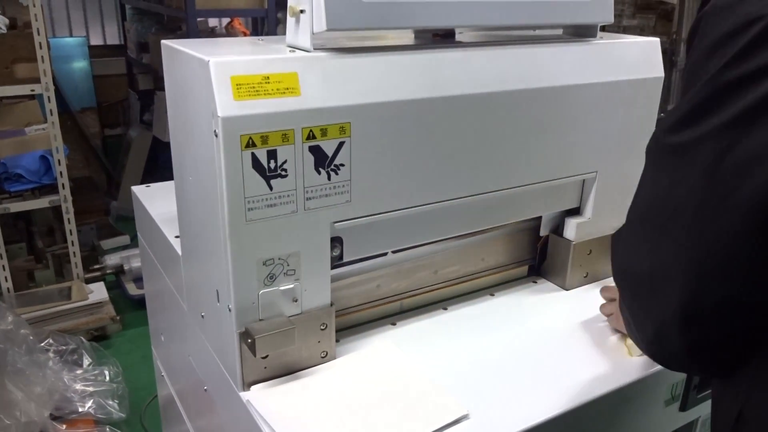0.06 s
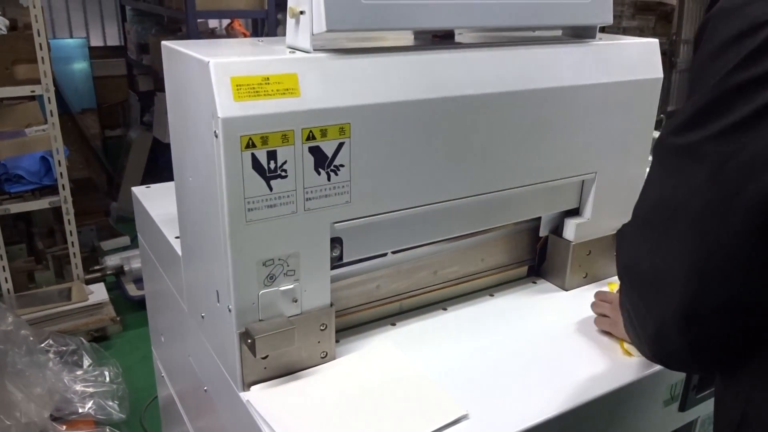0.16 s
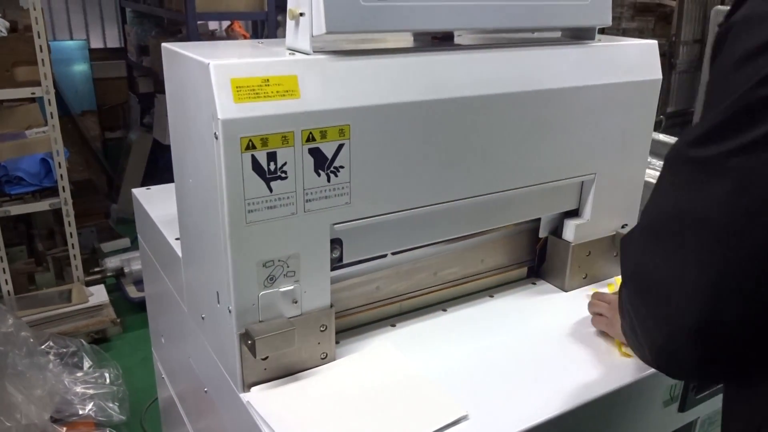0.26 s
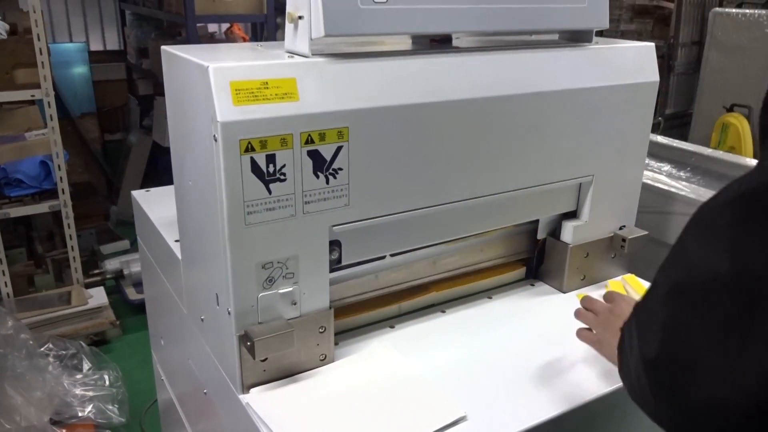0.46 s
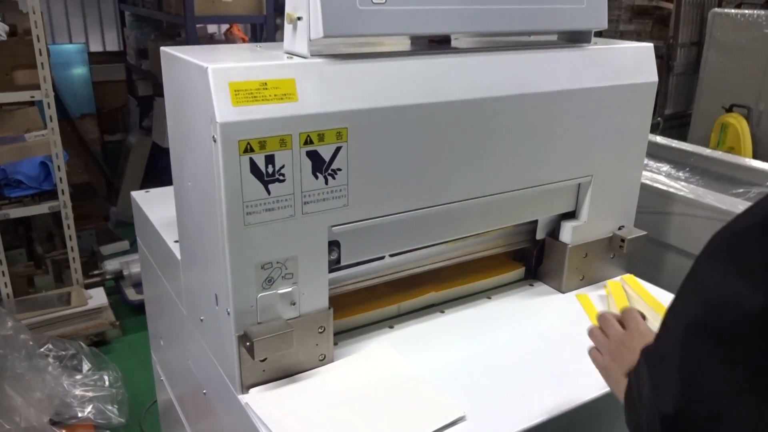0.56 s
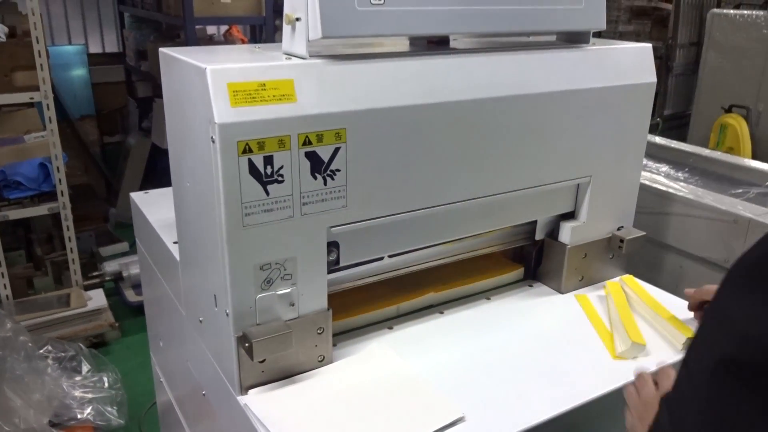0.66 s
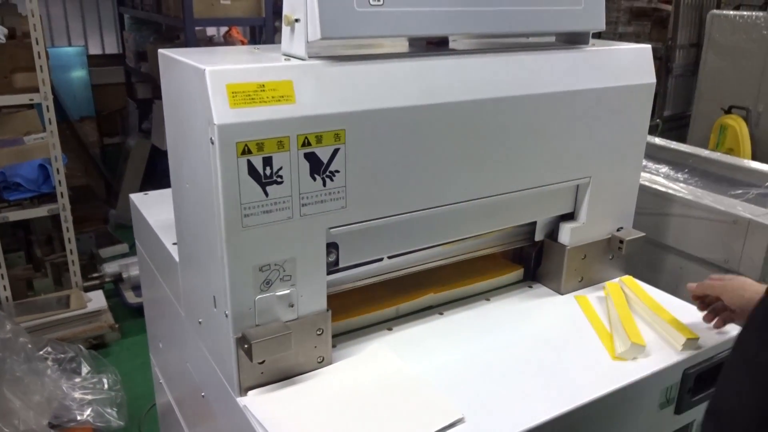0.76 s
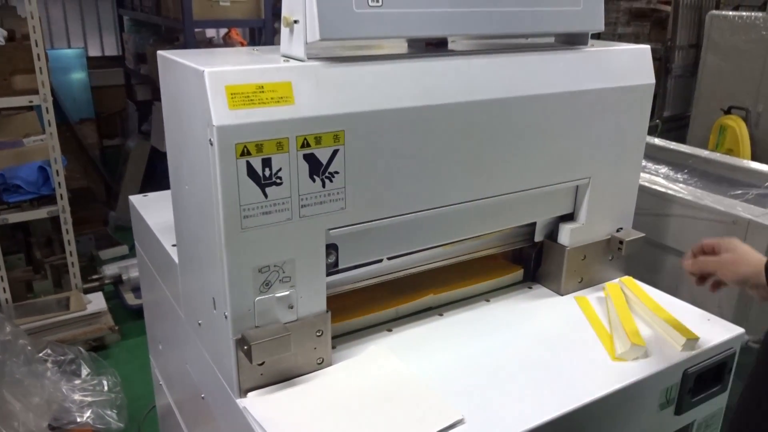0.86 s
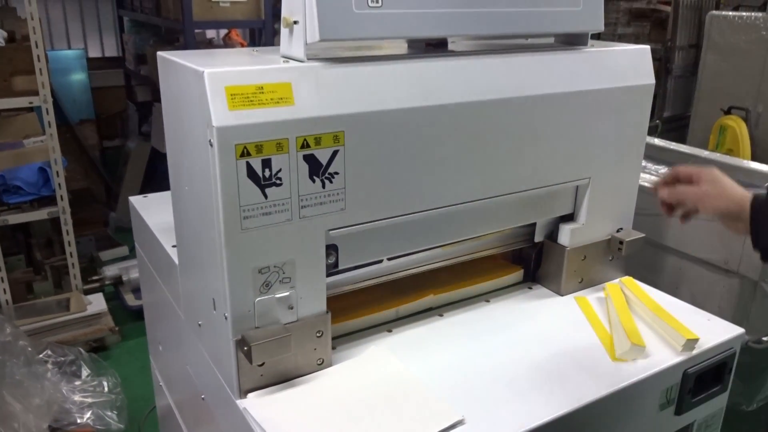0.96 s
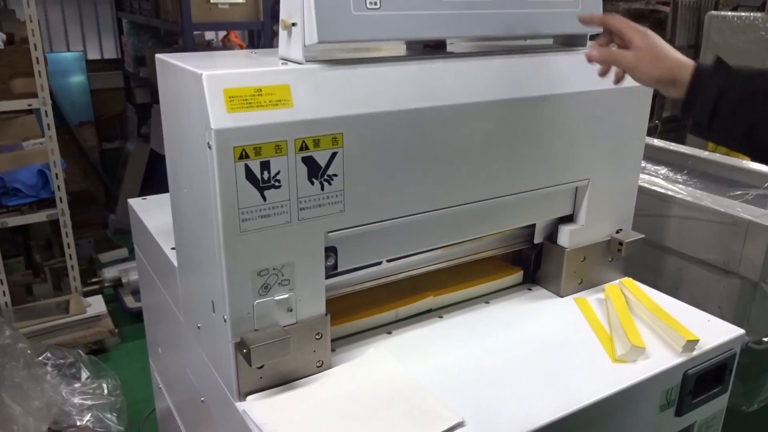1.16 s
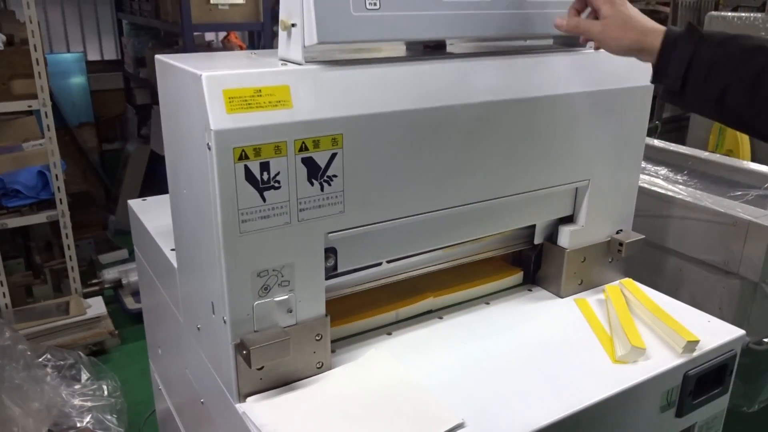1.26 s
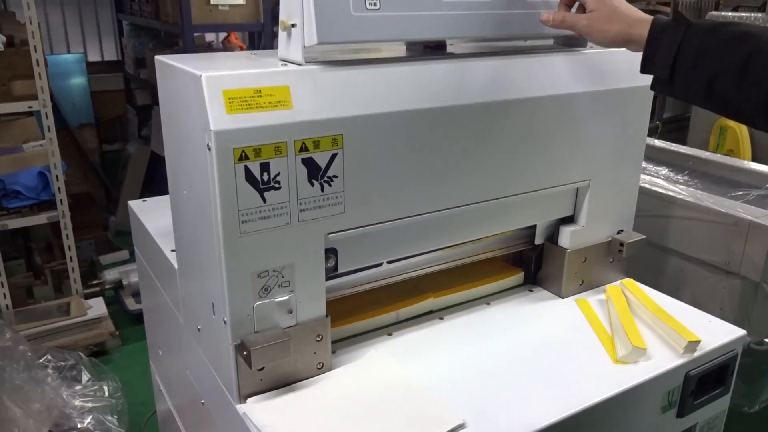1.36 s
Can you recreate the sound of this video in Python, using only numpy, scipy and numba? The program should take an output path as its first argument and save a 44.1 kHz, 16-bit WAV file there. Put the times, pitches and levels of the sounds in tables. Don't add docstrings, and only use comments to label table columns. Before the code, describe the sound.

Paper strips scrape across a cutter's steel table, then a heavy rattling clamp thud and latch click

```python
import sys
import numpy as np
from scipy import signal
from scipy.fft import rfft, irfft
from scipy.io import wavfile
from scipy.ndimage import uniform_filter1d
from numba import njit

SR = 44100
rng = np.random.default_rng(int(sys.argv[2]) if len(sys.argv) > 2 else 0)


def waveform_to_disk(signal):
    frames = np.transpose(np.atleast_2d(signal))
    scaled = np.clip(frames, -1, 1) * 32767
    samples = np.round(scaled).astype(np.int16)
    wavfile.write(sys.argv[1], SR, samples)


def volts_from_decibels(level):
    exponent = np.asarray(level, float) / 20
    return 10 ** exponent


N = 61739
TIME = np.arange(N) / SR


def level(x, db):
    return x * volts_from_decibels(db) / np.sqrt(np.mean(x ** 2))


def colour(x, points):
    p = np.array(points, float)
    f = np.fft.rfftfreq(x.shape[-1], 1 / SR)
    gain_db = np.interp(np.log(f + 1), np.log(p[:, 0]), p[:, 1])
    return irfft(rfft(x) * volts_from_decibels(gain_db), x.shape[-1])


def walk(rate):
    hold = int(SR / rate)
    held = np.repeat(rng.standard_normal(N // hold + 1), hold)
    return 1.3 * uniform_filter1d(uniform_filter1d(held, hold), hold)[:N]


# (frequency [Hz], level per Hz [dB])
HUM_COLOUR = [(20, -7), (40, -2), (70, -2), (170, 0), (330, -1), (800, -9), (1500, -18), (4000, -19),
              (16000, -24)]


def workshop_hum():
    noise = rng.standard_normal((2, N))
    return level(colour(noise, HUM_COLOUR), -43.5) * volts_from_decibels(0.13 * walk(12.0))


# (frequency [Hz], level per Hz [dB])
PAPER_COLOUR = [(200, 0.5), (500, -1.5), (1400, -4), (2000, -2.5), (4500, 1), (8000, 1.5), (13500, -0.5),
                (16000, -5)]


def earlier_slide():
    noise = rng.standard_normal((2, N))
    return level(colour(noise, PAPER_COLOUR), -43) * volts_from_decibels(-55 * TIME)


def curve(rows, axis):
    r = np.array(rows, float)
    return np.interp(TIME, r[:, 0], r[:, axis])


@njit
def high(x, hz, k):
    y, b, l = np.empty(len(x)), 0., 0.
    for i in range(len(x)):
        g = np.tan(np.pi * hz[i] / SR)
        v = (b + g * (x[i] - l)) / (1 + g * (g + k))
        y[i] = x[i] - k * v - l - g * v
        b, l = 2 * v - b, l + 2 * g * v
    return y


def edge(x, rows):
    hz = np.clip(curve(rows, axis=2), 100, 15000)
    steep = high(high(x, hz, np.sqrt(2)), hz, np.sqrt(2))
    return steep * volts_from_decibels(curve(rows, axis=1))


def ring(x, modes):
    out = 0
    for hz, db, t60 in modes:
        pole = np.exp(2j * np.pi * hz / SR - np.log(1000) / (max(t60, .003) * SR))
        out = out + volts_from_decibels(db) * signal.lfilter([1], [1, -pole], x).imag
    return out


def strikes(rows, modes, spread, crack_db, crack_s):
    out = np.zeros(N)
    t = np.arange(int(.3 * SR)) / SR
    luck = rng.standard_normal((len(rows), 2, len(modes)))
    grit = rng.standard_normal((len(rows), len(t)))
    for (s, db, hz), (gain, tune), noise in zip(rows, luck, grit):
        cycles = t * hz
        push = np.where(cycles < .5, np.sin(2 * np.pi * cycles), 0)
        body = 0
        for k, ((f, m, t60), g, d) in enumerate(zip(modes, gain, tune)):
            far_db = 6 * (np.log2(f / hz) / spread) ** 2
            mode = (f * (1 + .015 * d), m + 2 * g - far_db, t60)
            body = body + (-1) ** k * ring(push, [mode])
        band = signal.butter(2, [hz / 2, min(hz * 2.5, 18000)], "band", fs=SR, output="sos")
        crack = signal.sosfilt(band, noise * volts_from_decibels(-60 * t / crack_s))
        hit = body / np.abs(body).max() + volts_from_decibels(crack_db) * crack / np.abs(crack).max()
        i = int(s * SR)
        out[i:i + len(t)] += (volts_from_decibels(db) * hit)[:N - i]
    return out


# (frequency [Hz], width [Hz], level [dB])
SHEET_PEAKS = [(2070, 17, -6), (700, 360, -9), (2690, 40, -1)]


def friction(points, grit_db):
    grains = rng.standard_normal(N) * volts_from_decibels(grit_db * np.minimum(rng.exponential(size=N), 4))
    spectrum = rfft(colour(grains, points))
    hiss = 0
    for hz in 200 * 2 ** np.arange(0, 7, .5):
        octaves = np.log2((np.fft.rfftfreq(N, 1 / SR) + 1) / hz)
        band = np.clip(1 - 2 * np.abs(octaves), 0, 1)
        hiss = hiss + irfft(spectrum * band, N) * volts_from_decibels(walk(70))
    sheet = ring(grains, [(f, db, 2.2 / width) for f, width, db in SHEET_PEAKS])
    return level(hiss, 0), level(sheet, 0)


# (time [s], level [dB], low edge of the hiss [Hz])
DRAG = [(.1, -43, 9300), (.14, -46, 8900), (.185, -33.5, 7700), (0.2, -35.5, 2600), (0.23, -32, 1980),
        (.265, -29, 1400), (.285, -28.5, 510), (.305, -24.5, 432), (.335, -21.5, 360), (.4, -21, 395),
        (.45, -22, 430), (.51, -23, 454), (.55, -28.5, 420), (.585, -39.5, 417)]
# (time [s], level over the hiss [dB], pitch [Hz])
SING = [
    (.212, -14, 2370),
    (.235, -1, 2170),
    (.268, -10, 2060),
    (.278, 0, 4000),
    (.31, -3, 4050),
    (.34, -14, 4300),
    (.41, -7.5, 4530),
    (.47, -31, 5100),
]


def paper_drag():
    hiss, sheet = friction(PAPER_COLOUR, grit_db=1.5)
    pitch = curve(SING, axis=2)
    whistle = (high(hiss, pitch, 0.051) - high(hiss, pitch, 0.23)) * 0.23
    sing = whistle * volts_from_decibels(curve(SING, axis=1)) * (TIME > SING[0][0])
    resonance = volts_from_decibels(-72 * TIME) * sheet * (TIME > .212)
    drag = edge(hiss, DRAG) + volts_from_decibels(curve(DRAG, axis=1)) * (sing + resonance)
    release = np.clip((DRAG[-1][0] - TIME) / 0.061 + 1, 0, 1)
    return drag * release * (TIME > DRAG[0][0])


# (time [s], level [dB], centre [Hz])
BUMPS = [
    (.211, -32, 245),
    (.225, -38.5, 95),
    (.26, -44, 204),
    (.32, -48, 95),
    (.285, -32.5, 577),
    (.335, -28.5, 259),
    (.35, -33, 570),
    (.44, -31, 224),
    (.53, -24.5, 700),
    (.6, -39, 203),
]
# (frequency [Hz], level [dB], t60 [s])
BODY_MODES = [(104.7, -4, 0.09), (156, -4, 0.053), (230.3, -0.5, 0.053), (368, 7, 0.048), (453, 6, 0.02),
              (637, 9, 0.033), (765, 9, 0.03), (920, 10, 0.026), (1129, 9.5, 0.022), (1290, 15.5, 0.024),
              (1530, 10, 0.024), (1729, 3.5, 0.045), (1868, 5, 0.07), (2492, 6.5, 0.088)]


def table_bumps():
    return strikes(BUMPS, BODY_MODES, spread=0.35, crack_db=-7.5, crack_s=0.23)


# (time [s], level [dB])
SHOVE = [(.5875, -47), (.5895, -23), (.64, -20.5), (.657, -25.5), (.666, -30), (.705, -35), (.718, -25.5),
         (.75, -40.5), (.8, -49.5), (.845, -43.5), (.87, -44)]
# (frequency [Hz], level per Hz [dB])
SHOVE_COLOUR = [(450, -29), (720, -7.5), (1400, -15.5), (2300, -4), (3700, 0), (9500, -2), (13500, -6.5),
                (16000, -8.5)]


def paper_shove():
    hiss, _ = friction(SHOVE_COLOUR, grit_db=3.5)
    return hiss * volts_from_decibels(curve(SHOVE, axis=1)) * (TIME > SHOVE[0][0]) * (TIME < SHOVE[-1][0])


# (time [s], level [dB], centre [Hz])
BLOWS = [(.662, -6.5, 793), (.666, -17, 453), (.669, -14, 1120), (.672, -26, 342), (.671, -17.5, 194),
         (.677, -13.5, 197), (.677, -10, 800), (.681, -10.5, 1300), (.684, -29.5, 216), (.695, -17.5, 404),
         (.702, -20.5, 1260), (.69, -39, 2000), (.752, -24, 2490), (.772, -26.5, 2490), (.708, -34, 1300),
         (.724, -21, 368), (.737, -19, 202), (.715, -19, 360), (.72, -20, 774), (.734, -18, 450),
         (.7425, -13.5, 214), (.752, -19.5, 640), (.762, -21, 150), (.778, -24.5, 382), (.795, -26, 244),
         (.812, -25.5, 171), (.82, -30, 620), (.853, -38, 204), (.89, -31.5, 140)]


def clamp():
    blows = strikes(BLOWS, BODY_MODES, spread=0.54, crack_db=-11.5, crack_s=0.091)
    panels = level(ring(rng.standard_normal(N), BODY_MODES), 0)
    low_panels = level(ring(rng.standard_normal(N), BODY_MODES[1:4]), 0.047)
    since = TIME - .668
    fade = volts_from_decibels(-27.5 - 112 * np.abs(since)) * (since > 0)
    sos = signal.butter(2, 70., "high", fs=SR, output="sos")
    return signal.sosfilt(sos, blows + (panels + low_panels) * fade)


# (time [s], level [dB], centre [Hz])
LATCH = [(.851, -29, 4200), (.8645, -16.5, 3700), (.871, -24, 5200), (.879, -24.5, 3400), (.886, -33, 8600),
         (.895, -45, 4020), (.901, -39, 4000), (.911, -39, 3700), (.925, -34, 8600), (.857, -49, 5200),
         (.861, -36, 6660)]
# (frequency [Hz], level [dB], t60 [s])
LATCH_MODES = [(3090, -1.5, 0.011), (3550, -4, 0.015), (3690, 5, 0.0051), (5700, -4, .007),
               (6780, 1, 0.0094), (8600, 4.5, 0.013), (9750, 2.5, 0.0089)]


def latch():
    clicks = strikes(LATCH, LATCH_MODES, spread=1.16, crack_db=-7.5, crack_s=0.078)
    since = TIME - .865
    fade = volts_from_decibels(-39.5 - 172 * np.abs(since)) * (since > 0)
    spring = level(ring(rng.standard_normal(N), LATCH_MODES), 0) * fade
    return clicks + spring


# (time [s], level [dB])
TICKS = [
    (.5892, -17),
    (.717, -26),
    (1.2442, -29),
    (1.247, -31),
    (1.2512, -21),
]


def dry_ticks():
    ticks = np.zeros(N)
    for s, db in TICKS:
        i = int(s * SR)
        ticks[i:i + 60] += volts_from_decibels(db) * rng.standard_normal(60) * np.exp(-np.arange(60) / 12.)
    return signal.sosfilt(signal.butter(2, 9000., "high", fs=SR, output="sos"), ticks)


# (time [s], level [dB], low edge of the hiss [Hz])
BRUSH = [
    (1.17, -88, 408),
    (1.19, -50, 450),
    (1.226, -39.5, 600),
    (1.246, -33.5, 1210),
    (1.251, -27, 2520),
    (1.28, -30.5, 6460),
    (1.321, -40, 4040),
    (1.4, -40, 3000),
]


def hand_brush():
    cloth_colour = [(300, 22.0), (1500, 7), (8000, -8.5), (15000, -7.0)]  # Hz, dB per Hz
    hiss, _ = friction(cloth_colour, grit_db=2.0)
    return edge(hiss, BRUSH) * (TIME > BRUSH[0][0])


# (time [s], level [dB], centre [Hz])
TAPS = [(1.188, -32, 754), (1.195, -35, 900), (1.2215, -36, 1700), (1.258, -41, 2000), (1.21, -41, 1010),
        (1.222, -32.5, 515), (1.229, -35, 1300), (1.3362, -29.5, 2700), (1.3365, -29.5, 335),
        (1.343, -36, 310), (1.349, -33, 800), (1.346, -31.5, 2300), (1.357, -33, 2800),
        (1.364, -26.5, 2720), (1.38, -36, 3540), (1.388, -34, 4000)]
# (frequency [Hz], level [dB], t60 [s])
PANEL_MODES = [(297, 1, 0.033), (492, -13, 0.024), (800, 6, 0.014), (1400, -5, 0.017), (1950, -1, 0.022),
               (2300, 4, 0.018), (2726, -5.5, 0.059), (3480, 6, 0.014), (4160, -1, .015)]


def finger_taps():
    return strikes(TAPS, PANEL_MODES, spread=0.26, crack_db=-7, crack_s=0.091)


# (frequency [Hz], level per Hz [dB])
SCRAPE_COLOUR = [(200, -28), (500, 2), (1700, -7), (2400, -1.5), (4300, -6), (6000, -21), (12000, -21)]


def finger_scrape():
    since = TIME - 1.3365
    fade_db = -41 - 57 * since
    hiss, _ = friction(SCRAPE_COLOUR, grit_db=3.0)
    return hiss * volts_from_decibels(fade_db + 2.8 * walk(120)) * (since > 0)


# (frequency [Hz], t60 [s])
ROOM_T60 = [(100, 0.4), (500, 0.52), (2000, 0.46), (6000, 0.35), (14000, 0.17)]


def room(x):
    t = np.arange(int(.9 * SR)) / SR
    r = np.array(ROOM_T60)
    tails = 0
    for lo in 60 * 2. ** np.arange(8):
        sos = signal.butter(2, [lo, lo * 2], "band", fs=SR, output="sos")
        t60 = np.interp(np.log(lo * np.sqrt(2)), np.log(r[:, 0]), r[:, 1])
        noise = signal.sosfilt(sos, rng.standard_normal((2, len(t))))
        tails = tails + noise * volts_from_decibels(-60 * t / t60) / np.sqrt(t60)
    tails = tails * np.clip(t / 0.0097, 0, 1)
    tails = tails / np.sqrt(np.sum(tails[0] ** 2))
    return signal.fftconvolve(x[None], tails, axes=1)[:, :N]


# (frequency [Hz], side under mid [dB])
WIDTH = [(25, -23), (60, -27), (125, -41), (300, -32), (700, -23), (2000, -15), (5000, -13), (12000, -11.5)]
# (frequency [Hz], side under mid [dB])
SHOP_WIDTH = [(25, -21), (125, -20.5), (500, -8), (1500, -1.5), (3500, -8.5), (6000, -10.5), (12000, -11.5),
              (16000, -12)]
# (frequency [Hz], share [dB])
LEAN = [(100, -60), (700, -32), (2000, -22), (5000, -18), (8000, -18.5), (14000, -22)]


def stereo(dry, wet, shop):
    mid = dry + volts_from_decibels(-7) * wet[0] + shop[0]
    smear = rng.standard_normal(1300) * np.exp(-np.arange(1300) / 200.)
    near = signal.fftconvolve(dry, smear / np.sqrt(np.sum(smear ** 2)))[:N]
    side = colour(volts_from_decibels(-0.5) * near + volts_from_decibels(-9) * wet[1], WIDTH)
    side = side + colour(shop[1], SHOP_WIDTH) - colour(mid, LEAN)
    return np.array([mid + side, mid - side])


def scene():
    shop = workshop_hum() + earlier_slide()
    paper = paper_drag() + table_bumps() + paper_shove()
    hand = dry_ticks() + hand_brush() + finger_taps() + finger_scrape()
    dry = paper + clamp() + latch() + hand
    return stereo(dry, room(dry), shop)


def roll_off(x):
    return signal.sosfilt(signal.butter(12, 16100, fs=SR, output="sos"), x)


def record(dry):
    top_cut = signal.ellip(10, .3, 90, 15700, fs=SR, output="sos")
    mix = signal.sosfilt(top_cut, dry)
    return roll_off(mix)


dry = scene()
out = record(dry)
waveform_to_disk(out)
```